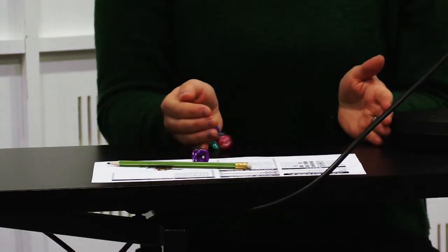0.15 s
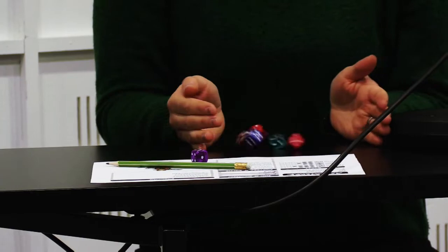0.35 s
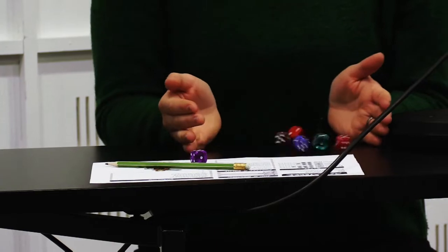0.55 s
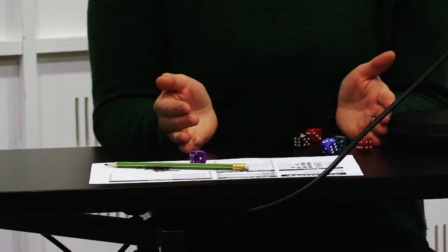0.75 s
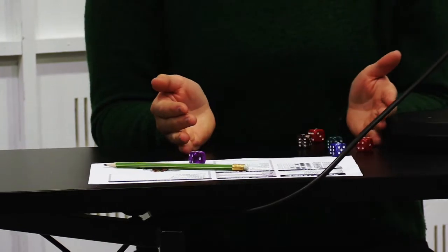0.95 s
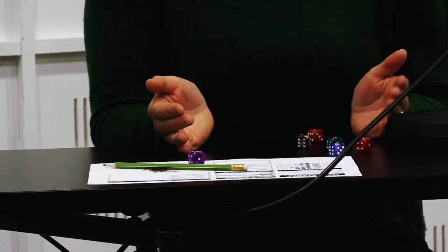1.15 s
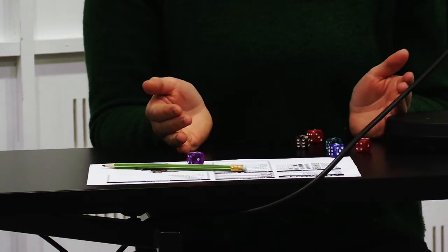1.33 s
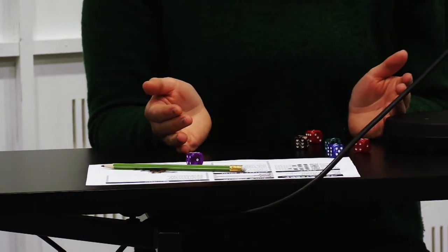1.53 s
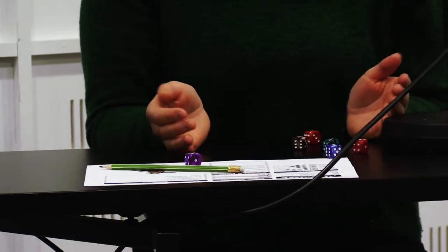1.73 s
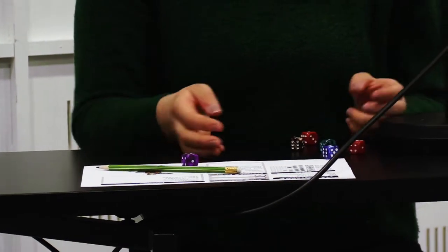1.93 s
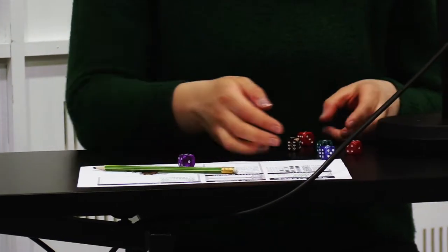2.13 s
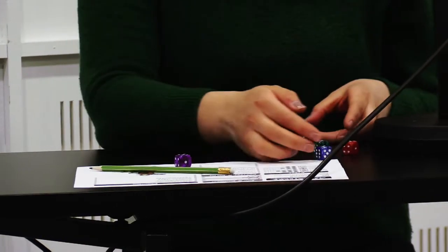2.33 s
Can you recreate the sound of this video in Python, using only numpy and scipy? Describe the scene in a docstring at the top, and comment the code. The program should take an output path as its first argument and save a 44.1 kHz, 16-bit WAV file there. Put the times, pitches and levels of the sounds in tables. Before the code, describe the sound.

Several hard dice thrown on a table, rattling brightly and settling, then dull pats of a hand

```python
"""A handful of dice is thrown on a laminated table in a small room, heard from close by.
Short noise bursts make the bounces, knocks and ever softer tumbling; dense ticks make a final whirr.
Dying sine waves make the tabletop ring and boom. Later a hand bumps the table three times.
Air noise, faint ventilation tones, rustling sleeves and a deep rumble lie underneath.
The hardest clacks overload the recorder."""
import sys
import numpy as np
from scipy import signal
from scipy.fft import rfft, irfft
from scipy.io import wavfile

SR = 44100
rng = np.random.default_rng(int(sys.argv[2]) if len(sys.argv) > 2 else 0)


def dump_mix(stems):
    """Bounce the given channels to the path in sys.argv[1] as a 16-bit WAV at rate SR."""
    frames = np.atleast_2d(stems).T  # one column per channel
    limited = np.clip(frames, -1, 1)  # hard clip at full scale
    pcm = np.round(limited * 32767).astype(np.int16)
    wavfile.write(sys.argv[1], SR, pcm)


N = 104913  # length in samples


def amp(db):
    """Turns decibels into gain."""
    return 10 ** (np.asarray(db) / 20)


def unit(x):
    """Scales a sound to an energy of one."""
    return x / np.sqrt(np.sum(x ** 2, -1, keepdims=True) + 1e-20)


def read(points, hz):
    """Reads a table of (frequency, value) between its points, on a log-frequency axis."""
    f, value = np.transpose(points)
    return np.interp(np.log(hz + 1), np.log(f + 1), value)


def add(mix, s, sound):
    """Mixes a sound in, starting at s seconds."""
    part = mix[max(round(s * SR), 0):][:len(sound)]
    part += sound[:len(part)]


def tint(x, db_of):
    """Filters a sound by a gain in dB that depends on frequency."""
    hz = np.fft.rfftfreq(x.shape[-1], 1 / SR)
    return irfft(rfft(x) * amp(db_of(hz)), x.shape[-1])


def steady(x, colour):
    """Gives a noise its colour and an rms of one."""
    return np.sqrt(N) * unit(tint(x, lambda f: read(colour, f)))


def fader(curve):
    """Gain over time from a level curve, silent outside it."""
    times, levels = np.transpose(curve)
    return amp(np.interp(np.arange(N) / SR, times, levels, left=-np.inf, right=-np.inf))


def bands(x, centres):
    """Splits a sound into overlapping bands that sum to the whole."""
    hz = np.fft.rfftfreq(len(x), 1 / SR)
    gains = np.array([np.interp(hz, centres, row) for row in np.eye(len(centres))])
    return irfft(rfft(x) * gains, len(x))


def modes(table, weights, size=22000):
    """Dying sines, one for each way the board can vibrate, each struck with its own weight."""
    t = np.arange(size) / SR
    return sum(weight * amp(db - 60 * t / t60) * np.sin(2 * np.pi * hz * t)
               for (hz, db, t60), weight in zip(table, weights))


# colour of the room air: (frequency [Hz], relative level per Hz [dB])
AIR_COLOUR = [(20, -12.5), (35, -13), (50, -16), (64, -15.5), (98, -1.5), (148, -6.5), (175, -17),
              (219, -10.5), (300, -16.5), (465, -23.5), (1010, -23), (2000, -26), (5500, -26), (15500, -28)]
# ventilation tones: (frequency [Hz], rms level [dB])
VENTILATION = [(145, -69), (587, -83.5), (737.5, -79.5), (1034, -79.5)]
# level of the sleeves as the arms move: (time [s], level [dB])
SLEEVE_LEVEL = [(0, -55.5), (.06, -73), (1.45, -85.5), (1.55, -69), (1.65, -80), (1.8, -73), (1.87, -64.5),
                (2.0, -70), (2.18, -73), (2.3, -67.5), (2.38, -66)]
# colour of the sleeves: (frequency [Hz], relative level [dB])
SLEEVE_COLOUR = [(200, -4.5), (1000, -5.5), (2500, -3), (5500, 1), (9000, -8), (16000, -13.5)]
# level of a deep rumble under the movements: (time [s], level [dB])
RUMBLE_LEVEL = [(0, -62), (.2, -48), (.5, -53), (.88, -67), (.98, -47), (1.05, -52), (1.15, -67),
                (1.6, -85), (1.85, -65), (1.98, -60), (2.15, -65), (2.38, -73)]
# colour of the rumble: (frequency [Hz], relative level [dB])
RUMBLE_COLOUR = [(10, -37), (22, -14.5), (35, 2), (50, -13.5), (80, -35.5), (200, -79.5)]
AIR_DB = -59  # rms level


def background():
    """Coloured noises for air, sleeves and rumble, plus sine tones whose phase wanders at random."""
    t = np.arange(N) / SR
    air = amp(AIR_DB) * steady(rng.standard_normal(N), AIR_COLOUR)
    hum = np.zeros(N)
    for hz, db in VENTILATION:
        wander = 0.017 * np.cumsum(rng.standard_normal(N))  # radians
        hum += amp(db) * np.sqrt(2) * np.sin(2 * np.pi * hz * t + wander)
    sleeves = fader(SLEEVE_LEVEL) * steady(rng.standard_normal(N), SLEEVE_COLOUR)
    rumble = fader(RUMBLE_LEVEL) * steady(rng.standard_normal(N), RUMBLE_COLOUR)
    return air + hum + sleeves + rumble


# how fast each pitch in a clack dies: (frequency [Hz], time to fall 60 dB [s])
CLACK_T60 = [(500, 0.059), (2000, 0.032), (4000, 0.024), (8000, .012), (16000, .008)]
ATTACK_S, HOLD_S = 0.00041, 0.002  # rise time; time before the decay starts
LAG_S = 0.0013  # lag of 1 kHz bending waves, before all bands are moved a third of it earlier


def clack(colour, size=2048):
    """A hard corner strikes: a dense, short ring whose treble arrives and dies first."""
    centres = np.array([400, 900, 1500, 2300, 3300, 4500, 6000, 8000, 11000, 16000.])
    hz = centres[:, None]
    lag = LAG_S * (1000 / hz) ** .5 - LAG_S / 3
    t = np.maximum(np.arange(size) / SR - lag, 0)
    decay = amp(-60 * np.maximum(t - HOLD_S, 0) / read(CLACK_T60, hz))
    shape = np.minimum(t / ATTACK_S, 1) * decay
    parts = unit(bands(rng.standard_normal(size), centres) * shape)
    band_gain = np.sqrt(np.gradient(centres) / (SR / 4))  # wider bands carry more energy
    burst = band_gain @ parts
    return tint(np.pad(burst, size // 8), colour)[size // 8:]


# basic colour of a clack: (frequency [Hz], gain [dB])
CLACK_COLOUR = [(300, -16), (700, -18), (1100, -8.5), (1600, -4), (2400, -1.5), (3600, 3), (4700, 0.5),
                (6000, 2), (7200, -4.5), (8500, -10), (10500, -22.5), (12000, -31), (16000, -42.5)]
FACE_DB = 2.5  # spread of colour from one contact to the next


def bounce(tilt_db):
    """Die on tabletop: a harder contact is brighter, and each contact has its own colour."""
    own = np.transpose([np.geomspace(700, 12000, 12), FACE_DB * rng.standard_normal(12)])

    def colour(f):
        octaves = np.log2(np.clip(f, 1100, 8500) / 4500)
        return read(CLACK_COLOUR, f) + read(own, f) + tilt_db * octaves
    return clack(colour)


# dice hitting the table:
# (time [s], relative level [dB], brightness [dB per octave], push into the tabletop [dB])
HITS = [(0.081, -10.5, 0, -10.5), (0.0941, -11.5, 2, -11.5), (0.1141, -18.5, -6, -12),
        (.1320, -8.5, -2.5, -12), (0.1455, -26, -5.5, -10), (0.1659, -6, 1.5, -25), (0.1846, -5, -1, -12),
        (.1940, -9, -3, -10), (0.2069, -8, -1, -15), (0.2154, -37, -4, -16), (0.2295, -16.5, 0, -14),
        (0.2458, -10.5, -1.5, -14), (.2570, -8, -4.5, -20), (0.277, -7.5, -1.5, -10),
        (0.3065, -15.5, -3, -24), (0.3105, -17, -6.5, -39), (0.3278, -17.5, -4, -18),
        (0.3389, -10, -4, -22), (0.343, -16, 0, -15), (0.3699, -13.5, -4, -15), (0.3793, -15, -6, -24),
        (0.3878, -14.5, -3.5, -17), (0.3982, -21, -6.5, -15.5), (0.4071, -18.5, -4.5, -18),
        (0.4173, -14, -4.5, -17), (.4367, -17.5, 0, -32), (0.4407, -19, -6.5, -18),
        (0.4511, -9.5, 0.5, -22), (0.463, -20.5, 4, -33), (.4730, -16, -6, -18.5),
        (0.4828, -16.5, -3.5, -19), (0.4965, -16.5, 0, -17), (0.5023, -17, -6, -16), (0.5332, -21, -7, -21),
        (.5392, -17.5, -3.5, -23), (0.5535, -19.5, 6.5, -28), (.5587, -17, -5, -19),
        (.5820, -11.5, 4, -18.5), (0.5927, -18, -5, -36), (0.6131, -22, -2, -27), (0.6285, -21.5, 0, -20),
        (0.6345, -19, 2, -21.5), (0.6437, -12, 3.5, -25.5), (0.6628, -25.5, -9, -19.5),
        (0.6728, -21.5, 6, -24), (0.6877, -13.5, -1, -21), (0.705, -25, 4, -18.5), (.7208, -15.5, 4.5, -22),
        (0.7358, -22, -2.5, -25), (0.747, -20, 0, -20), (0.7533, -24, -3.5, -19),
        (0.7659, -23.5, -4, -27.5), (0.7811, -24.5, -4, -23.5), (0.7947, -34.5, -9, -23.5),
        (.8110, -30, -6.5, -33), (.8220, -30.5, -5, -25.5), (.8405, -30, -7, -26.5), (0.8583, -35, -5, -40),
        (.8730, -30, -3, -57), (.9080, -32, -4, -45), (0.9341, -36, -4, -33.5), (0.967, -57, -7, -31),
        (0.991, -40.5, -7, -30), (1.038, -34.5, -1, -42), (1.0480, -31, 0, -35), (1.0540, -30.5, 0, -39),
        (1.0705, -35.5, -6, -45), (1.0833, -35.5, 3, -42.5), (1.0964, -37, 0, -40)]
# tabletop vibrations that vary with where a die lands:
# (frequency [Hz], relative level [dB], time to fall 60 dB [s])
RING = [(228, -1.5, 0.33), (323, -8.5, .3), (452, -2, 0.16), (549, -1, 0.27), (576, -4, 0.26),
        (1100, -7, .2), (1250, -4.5, 0.26), (1482, 2.5, 0.15), (2197, -3.5, .2), (2423, -2, 0.3),
        (2830, 2, .15), (2960, -0.5, 0.14), (3400, -0.5, .15), (3370, -1.5, .15)]
# middle level of the small ticks of tumbling edges: (time [s], relative level [dB])
TUMBLE = [(.085, -31), (.2, -28), (.4, -30.5), (.6, -33), (0.779, -34.5), (.88, -47)]
CLACK_DB, RING_DB = 16.5, -30  # gains added to the relative levels
TICKS_PER_S, TICK_SPREAD_DB = 110, 3.5
TICK_TILT_DB, TICK_PUSH_DB = -5.1, -2.5  # brightness per octave; push relative to the tick


def dice():
    """Bounces and tumbling ticks: returns the clatter and the pushes given to the table."""
    clatter, push = np.zeros(N), np.zeros(N)
    for s, db, tilt_db, push_db in HITS:
        add(clatter, s, amp(db + CLACK_DB) * bounce(tilt_db))
        ring = modes(RING, rng.standard_normal(len(RING)), size=16000)
        add(clatter, s, amp(db + RING_DB) * ring)
        add(push, s, amp([push_db]))
    times, levels = np.transpose(TUMBLE)
    places, strengths = rng.random(size=200), rng.standard_normal(size=200)
    for k, (place, strength) in enumerate(zip(places, strengths)):
        s = times[0] + (k + place) / TICKS_PER_S  # one tick at a random place in each slot
        if s < times[-1]:
            db = np.interp(s, times, levels) + TICK_SPREAD_DB * strength
            add(clatter, s, amp(db + CLACK_DB) * bounce(TICK_TILT_DB))
            add(push, s, amp([db + TICK_PUSH_DB]))
    return clatter, push


# low vibrations of the tabletop: (frequency [Hz], relative level [dB], time to fall 60 dB [s])
BOOM = [(101.2, -10.5, .22), (112, -8.5, 0.28), (142, -13.5, .1), (161, -13, 0.19), (207.3, -9.5, 0.38),
        (226.5, -5.5, 0.27), (453, -23.5, .15)]
BOOM_DB, BOARD_HZ = -11, 86.7  # gain; the board radiates little below this frequency


def tabletop(push):
    """The board booms under every push, but radiates little deep bass."""
    boom = signal.fftconvolve(push, modes(BOOM, np.ones(len(BOOM))))[:N]
    bass_cut = signal.butter(4, BOARD_HZ, "high", fs=SR, output="sos")
    return amp(BOOM_DB) * signal.sosfilt(bass_cut, boom)


# how long the room's tail lasts: (frequency [Hz], time to fall 60 dB [s])
ROOM_T60 = [(200, 1.24), (1400, 0.38), (3700, 0.41), (8000, 0.06), (15000, 0.54)]
# colour of the room's echo: (frequency [Hz], gain [dB])
ROOM_COLOUR = [(200, -35.5), (1000, 0.5), (2500, -3), (5000, -7.5), (8000, -1), (15000, 5.5)]
ROOM_DB, ROOM_GAP_S = -2, 0.006  # tail gain; silence before any echo
EARLY_DB, EARLY_T60 = -14, 0.067  # quick reflections: gain; seconds to fall 60 dB


def room(x, size=24000):
    """Quick reflections from nearby things and a diffuse tail, both made of dying noise."""
    centres, t = np.geomspace(200, 15000, 8), np.arange(size) / SR
    decay = amp(-60 * t / read(ROOM_T60, centres[:, None]))
    tail = unit((bands(rng.standard_normal(size), centres) * decay).sum(0))
    early = unit(rng.standard_normal(size) * amp(-60 * t / EARLY_T60))
    echo = amp(ROOM_DB) * tail + amp(EARLY_DB) * early
    delayed = np.pad(echo, (round(ROOM_GAP_S * SR), 0))
    return signal.fftconvolve(x, tint(delayed, lambda f: read(ROOM_COLOUR, f)))[:N]


# dice knocking together: (time [s], relative level [dB], pitch of the crack [Hz])
KNOCKS = [(0.082, -2, 3320), (.1203, -21, 6000), (0.1307, -16.5, 5940), (0.327, -14.5, 5730),
          (.3392, -10, 5800), (0.5437, -11.5, 5700), (0.583, -14.5, 4600), (0.6284, -21, 5900),
          (.6449, -17, 4340)]
KNOCK_DB, KNOCK_WIDTH = 17.5, 0.33  # gain; width of the peak in octaves
KNOCK_SKIRT_DB, KNOCK_BASS_DB = -10, -21.5  # cut away from the peak; extra cut below it


def knocks():
    """Die on die: a crack gathered round one pitch, with little body."""
    out = np.zeros(N)
    for s, db, hz in KNOCKS:
        def colour(f):
            octaves = np.log2((f + 1) / hz)
            peak = np.exp(-(octaves / KNOCK_WIDTH) ** 2 / 2)
            skirt = KNOCK_SKIRT_DB * (1 - peak)
            bass = KNOCK_BASS_DB * np.clip(-octaves - KNOCK_WIDTH, 0, 1)
            return read(CLACK_COLOUR, f) + skirt + bass
        add(out, s, amp(db + KNOCK_DB) * clack(colour))
    return out


# colour of a die spinning on its edges: (frequency [Hz], relative level [dB])
SPIN_COLOUR = [(400, -25), (900, -7), (1500, -6), (2100, 2), (3100, 2.5), (3700, -5), (4600, -5.5),
               (5300, -3), (6300, -5.5), (6900, -28), (7700, -9), (8500, -39), (14000, -44)]
# level of that whirr: (time [s], level [dB])
SPIN_LEVEL = [(0.502, -38.5), (.78, -40), (.86, -41.5), (.89, -50), (0.911, -42.5), (.95, -45),
              (.99, -40.5), (1.02, -49), (1.045, -41), (1.09, -44.5), (1.12, -56)]
SPIN_TICKS_PER_S, SPIN_SPREAD_DB = 900, 3  # average rate; spread of tick strength


def spin():
    """The last dice spin down: edge contacts so dense that they merge into a whirr."""
    happens = rng.random(N) < SPIN_TICKS_PER_S / SR
    strength = rng.choice([-1, 1], N) * amp(SPIN_SPREAD_DB * rng.standard_normal(N))
    return steady(happens * strength, SPIN_COLOUR) * fader(SPIN_LEVEL)


# the hand bumps the table: (time [s], relative level [dB], contact time [s])
BUMPS = [(1.747, -28, 0.0064), (1.789, -39.5, 0.0017), (1.9061, -15, 0.0058)]


def hand():
    """Soft, slow pushes that reach only the lowest vibrations of the board."""
    push = np.zeros(N)
    for s, db, contact_s in BUMPS:
        pulse = np.sin(np.pi * np.arange(0, 1, 1 / (contact_s * SR))) ** 2
        add(push, s, amp(db) * pulse / pulse.sum())
    return push


PAT_DB, PAT_HZ = -15.5, 397  # gain; centre pitch
PAT_WIDTH, PAT_T60 = 0.55, 0.2  # octaves from the centre to 3 dB down; seconds to fall 60 dB


def pats(size=8192):
    """The dull pat of skin on the board with each bump: a dying puff of noise round one pitch."""
    def colour(f):
        octaves = np.log2((f + 1) / PAT_HZ)
        return -np.minimum(3 * (octaves / PAT_WIDTH) ** 2, 45)
    out, t = np.zeros(N), np.arange(size) / SR
    for s, db, _ in BUMPS:
        puff = tint(rng.standard_normal(size), colour)
        add(out, s, amp(db + PAT_DB) * unit(puff * amp(-60 * t / PAT_T60)))
    return out


def scene():
    """Dice, table, hand and room, the same in both channels."""
    floor = background()
    clatter, push = dice()
    clatter = clatter + knocks() + spin()
    mono = floor + clatter + room(clatter) + tabletop(push + hand()) + pats()
    return np.array([mono, mono])


CEILING, KNEE = 0.38, 8  # largest amplitude before the band limit; a higher knee bends more sharply
EDGE_HZ = 16000  # top of the band


def record(dry):
    """Soft overload rounds off the peaks, then a low-pass filter removes the highest treble."""
    limited = dry / (1 + abs(dry / CEILING) ** KNEE) ** (1 / KNEE)
    low_pass = signal.firwin(401, EDGE_HZ, window=("kaiser", 9), fs=SR)
    return signal.oaconvolve(limited, low_pass[None], "same")


dry = scene()
out = record(dry)
dump_mix(out)
```